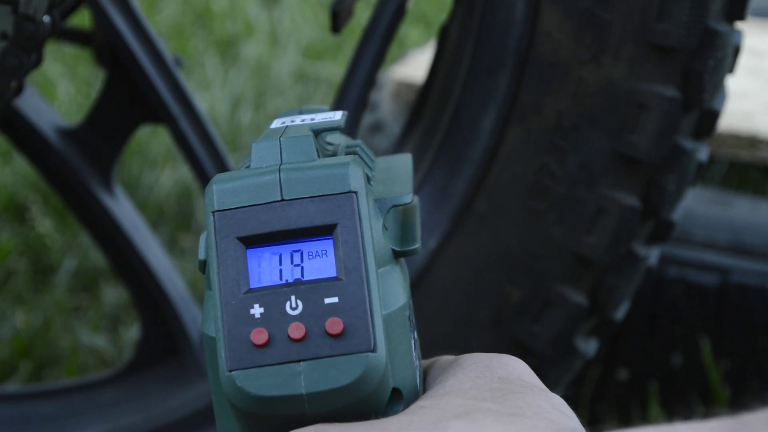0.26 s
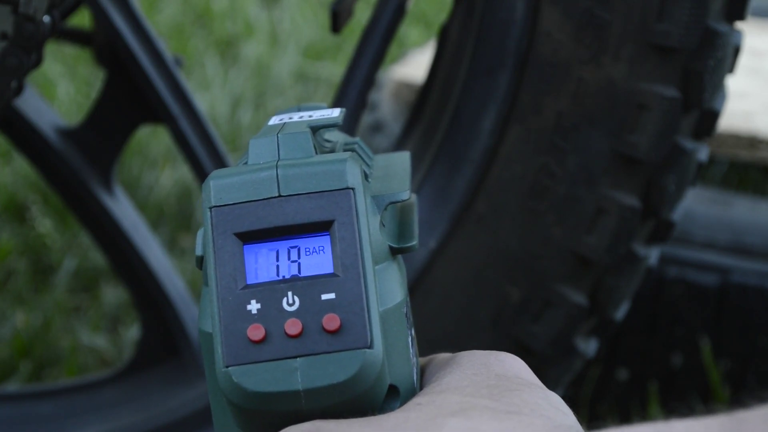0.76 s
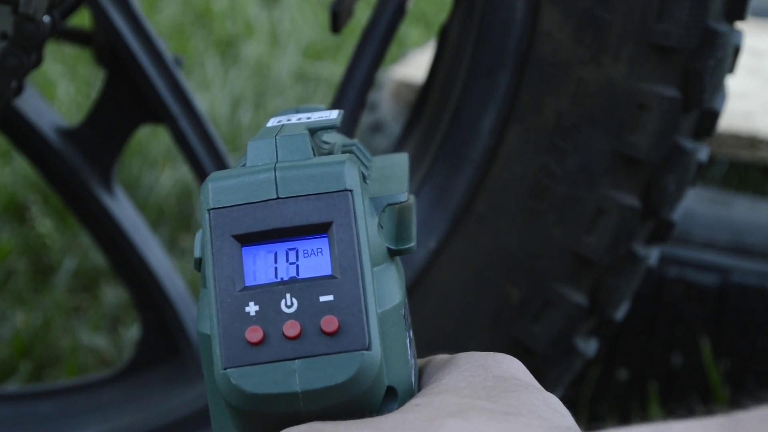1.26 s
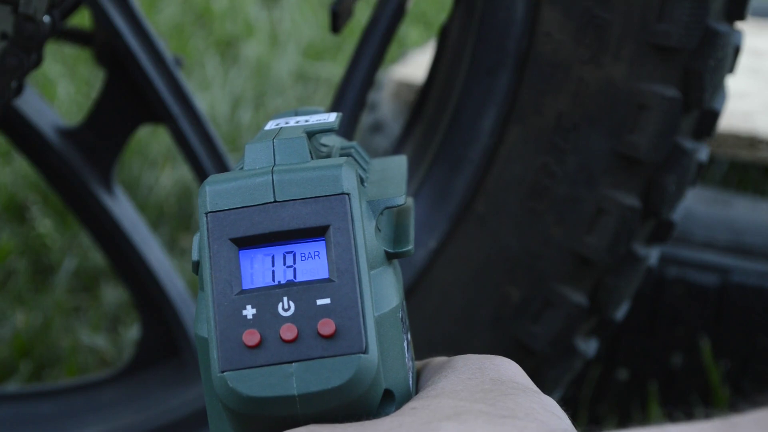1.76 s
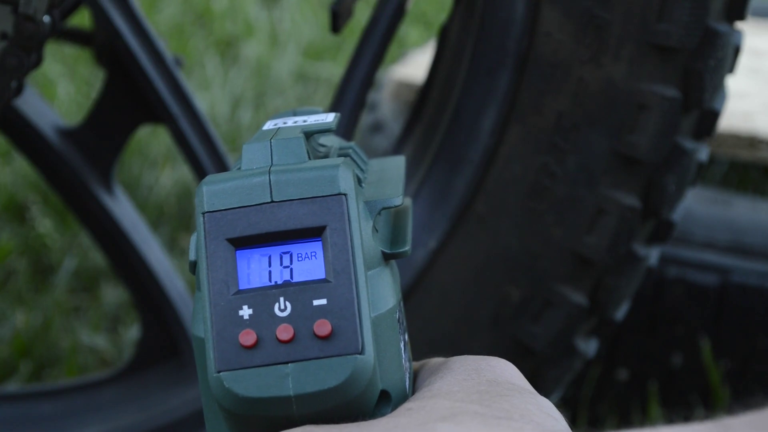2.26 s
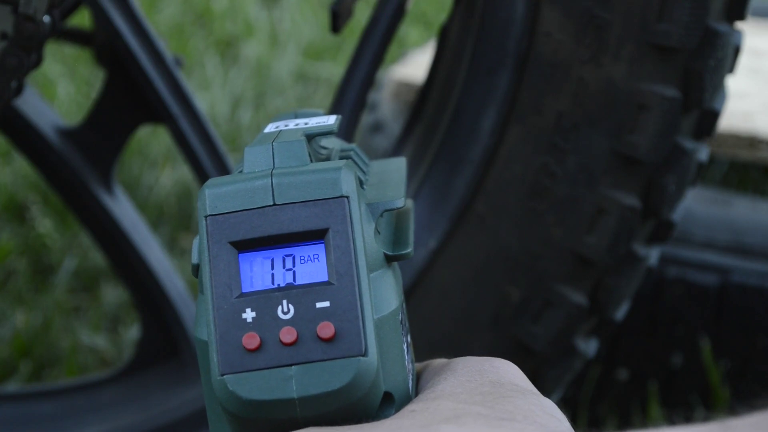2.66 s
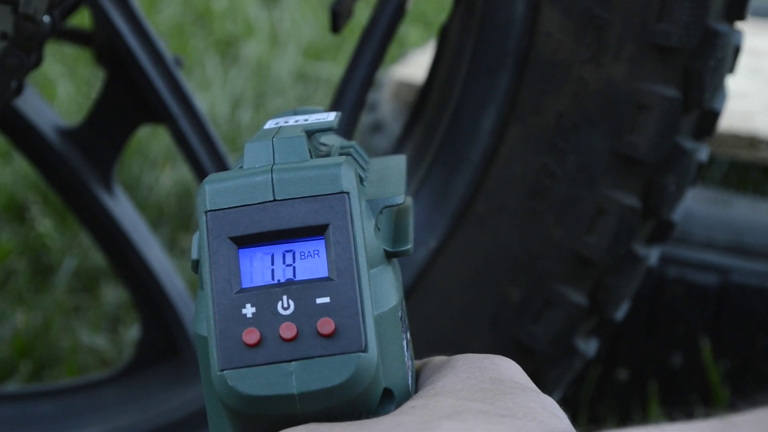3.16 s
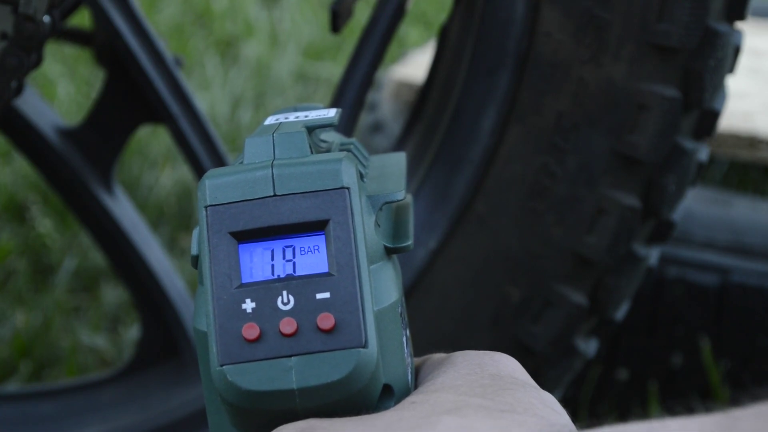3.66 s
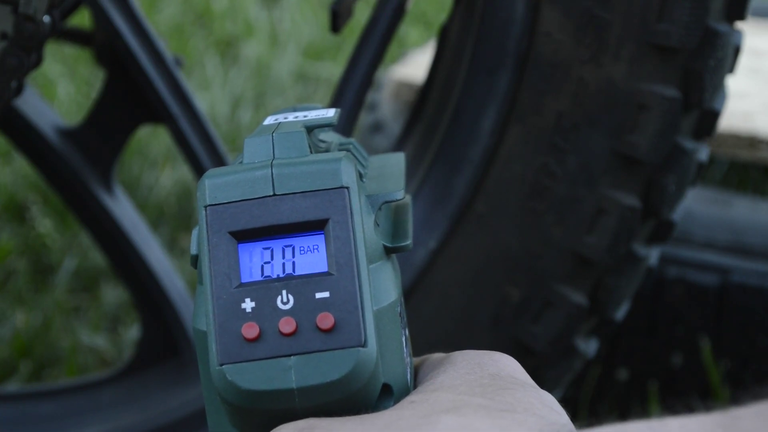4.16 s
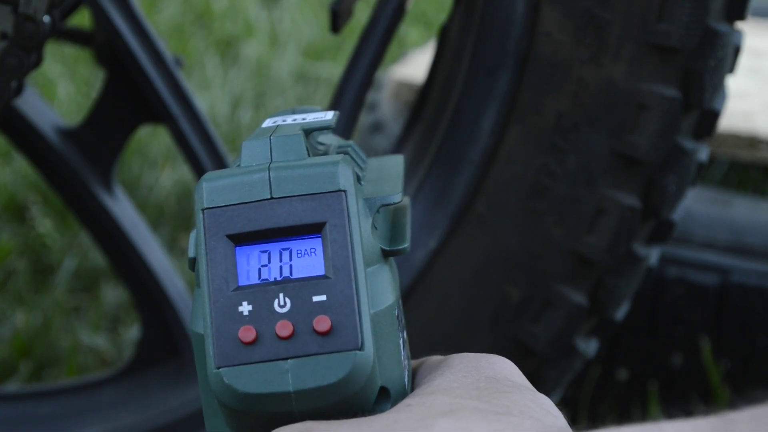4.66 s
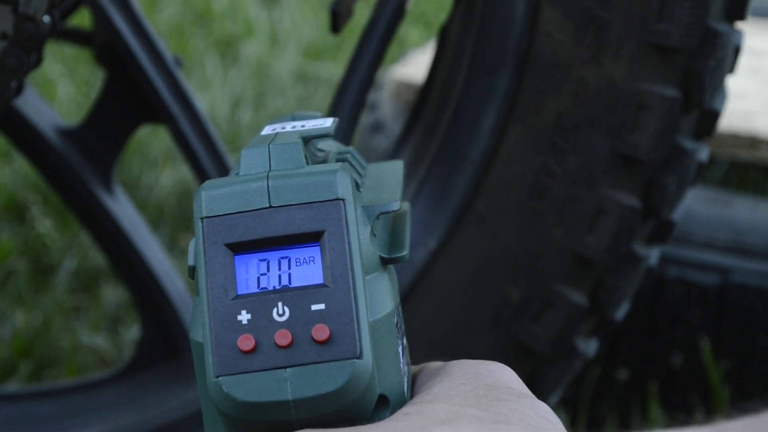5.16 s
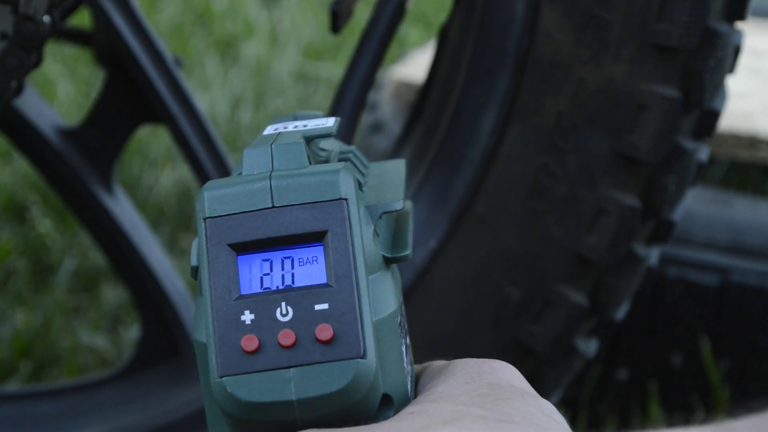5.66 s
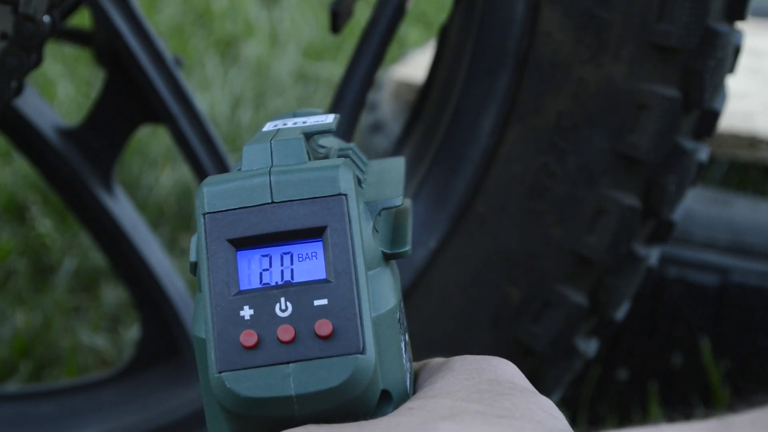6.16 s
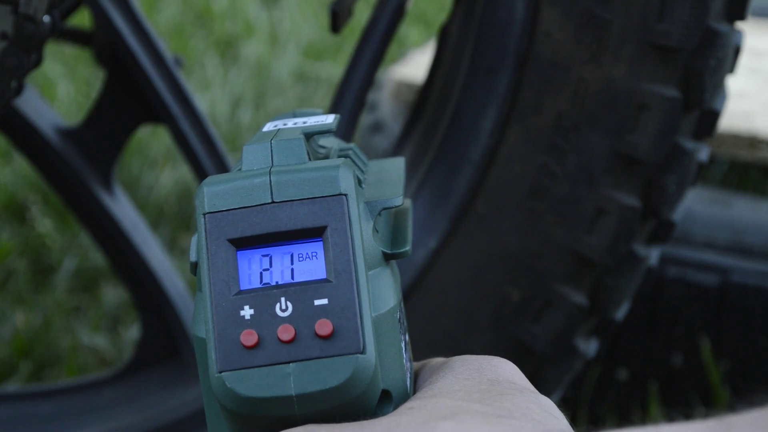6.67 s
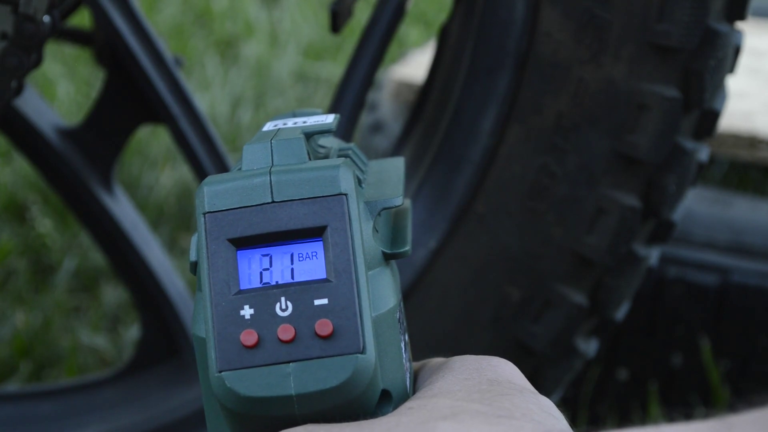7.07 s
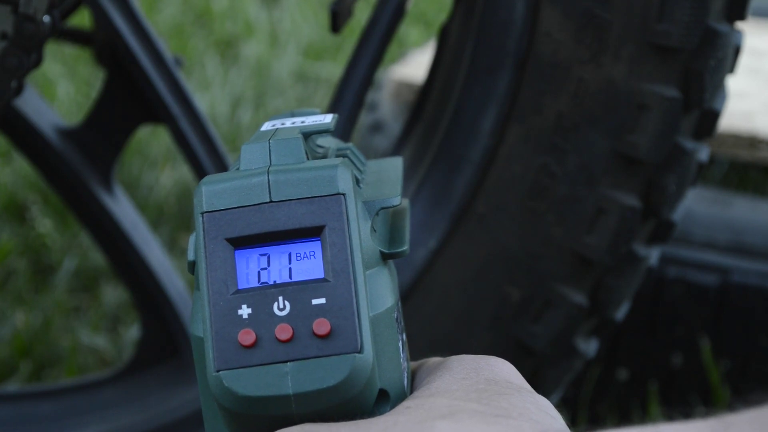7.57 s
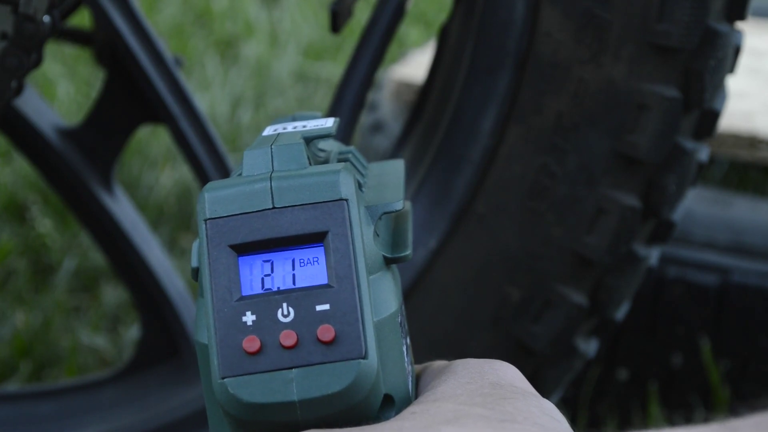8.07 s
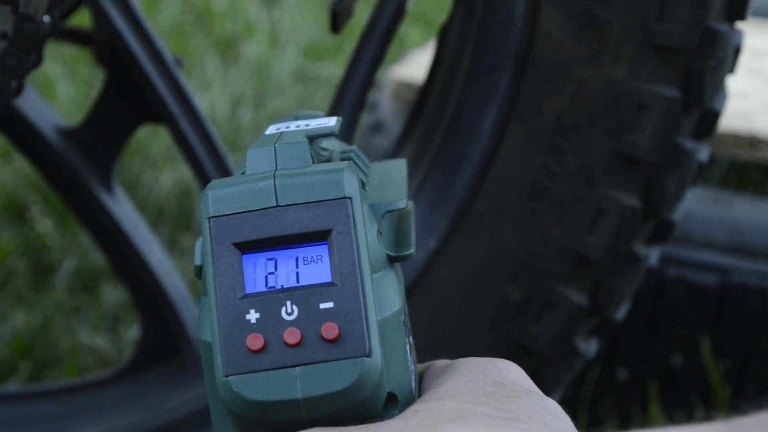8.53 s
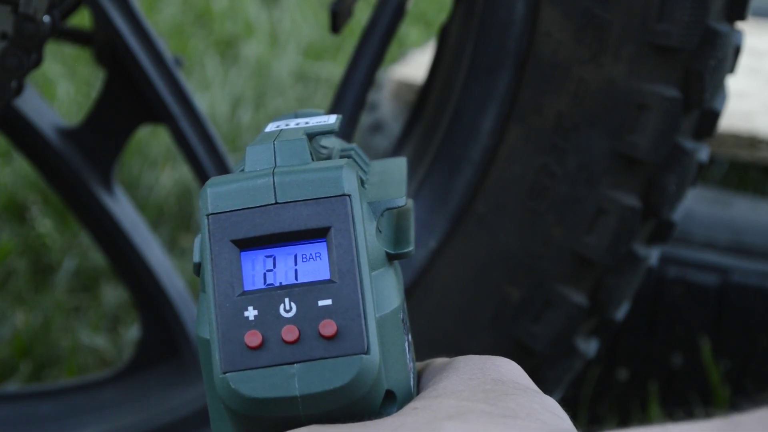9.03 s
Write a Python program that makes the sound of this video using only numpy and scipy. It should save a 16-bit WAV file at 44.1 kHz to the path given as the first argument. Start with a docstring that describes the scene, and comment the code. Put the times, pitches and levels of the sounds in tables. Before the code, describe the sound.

Continuous handheld tyre inflator, very close and dry, in open air. Rapid valve pops blur into a rough low buzz; plastic gears whine and grind brightly around three kilohertz, with motor hum and steady hiss. Speed hardly changes, wavering slightly under load. A distant engine rumble dies away early on; the pump continues to the end.

```python
"""Out of doors, a small cordless piston pump fills a tyre, held close to the microphone. From the start an
11-tooth pinion drives a 49-tooth crank gear: at every turn the loaded teeth whine and grind in the plastic
housing and a valve pops, alternately early and late, over motor hum and a hiss of air. A far engine rumbles
behind the opening seconds and fades away; past the middle a faint hum swells and goes. The pump's tones are
sines locked to the crank or motor, the faint hum a sine of steady pitch; grinding, hiss and rumble are filtered
noise."""
import sys
import numpy as np
from scipy import signal
from scipy.fft import rfft, irfft
from scipy.io import wavfile
from scipy.ndimage import uniform_filter1d, minimum_filter1d, map_coordinates

SR = 44100
rng = np.random.default_rng(int(sys.argv[2]) if len(sys.argv) > 2 else 0)


def generate_wav(signal):
    """Clip the signal to [-1, 1] and save it as 16-bit WAV at the path in sys.argv[1]."""
    frames = np.transpose(np.atleast_2d(signal))
    scaled = np.clip(frames, -1, 1) * 32767
    pcm = np.round(scaled).astype(np.int16)
    wavfile.write(sys.argv[1], SR, pcm)


N = 410130
T = np.arange(N) / SR  # seconds

# The crank's speed sags and wavers as the tyre fills. Each row: time in seconds, speed in crank turns per second.
CRANK_SPEED = [(0.0, 57.666), (0.79, 57.762), (1.39, 57.764), (2.37, 57.635), (3.17, 57.752),
               (4.16, 57.625), (4.35, 57.671), (5.34, 57.629), (6.73, 57.633), (7.12, 57.508),
               (7.52, 57.635), (8.11, 57.579), (8.31, 57.616), (9.3, 57.44)]
# Pitches at which the loaded teeth sing in the housing. Each entry: cycles per crank turn.
SONG_PITCHES = [54.2, 46.3, 53.5, 39.5, 35, 63.5, 96, 107, 145, 150, 194]
# Swell of each song, in the same order. Each row: centre in turns, spread in turns,
# peak level in dB before runout and drift, share of the growth as the tyre fills (0 to 1).
SONG_SWELLS = [(0.857, 0.12, -21, 0), (0.017, 0.1, -27, 0), (0.231, 0.041, -26.5, 0.28),
               (0.68, 0.076, -43.5, 0), (0.0991, 0.13, -38, 0), (0.75, 0.061, -44, 0),
               (0.96, 0.15, -41.5, 0.43), (0.87, 0.1, -46.5, 0.11), (1, 0.12, -48, 0),
               (0.733, 0.076, -44, 0), (0.89, 0.08, -46, 0)]
# Tooth tone. Each row: multiple of the tooth rate, level at the start in dB rms.
TOOTH_TONES = [(1, -58), (2, -53.5)]
# Valve pop and shaking of the pump body. Each row: crank order (cycles per turn), level in dB rms before drift.
POP_ORDERS = [(1, -55), (2, -47), (3, -55.5), (4, -51.5), (5, -53), (6, -55.5), (7, -52), (8, -51.5),
              (9, -48.5), (10, -43.5), (11, -55), (12, -46), (13, -50), (14, -44.5), (15, -54.5), (16, -57),
              (17, -68), (18, -57.5), (19, -54.5), (20, -54), (21, -51.5), (22, -60), (23, -55.5),
              (24, -53.5), (25, -51.5), (26, -54), (27, -63), (28, -63)]
# Commutator hum. Each row: motor order (cycles per motor turn), level in dB rms before drift.
COMMUTATOR_ORDERS = [(2, -69), (3, -55), (6, -62)]
# Broad colour of the plastic housing. Each row: frequency in Hz, relative level in dB.
HOUSING_COLOUR = [(380, -28.5), (700, -12), (1400, -11), (2500, -8), (3200, -4.5), (4200, -14),
                  (5200, -17.5), (6200, -27), (7500, -27), (9500, -22.5), (11000, -32), (13000, -36),
                  (16000, -40.5)]
# Panel resonances above that colour and dips below it. Each row: centre in Hz, width in Hz, height in dB.
PANEL_RESONANCES = [(830, 210, 2.5), (1800, 58, -7.5), (1950, 200, 1), (2180, 250, -2), (2760, 200, 2.5),
                    (2757, 165, -7.5), (3275, 270, 3), (3774, 340, 3.5), (4150, 99, 3.5), (4350, 230, -3.5),
                    (4515, 79, 8.5), (4900, 75, 2), (5770, 230, 1), (5850, 110, 0), (6630, 280, 7.5),
                    (7840, 150, 3), (8720, 210, -0.5), (9390, 620, 4.5), (9600, 280, 0.5),
                    (10350, 220, 8.5), (11250, 300, 0), (11600, 200, 1), (12500, 500, 2.5),
                    (13800, 500, 2.5)]
# Far engine fading in the distance. Each row: time in seconds, level in dB rms.
FAR_ENGINE_LEVEL = [(0, -48), (.5, -53), (1, -50.5), (1.5, -61), (2.7, -64), (4, -65), (5, -74), (9.3, -76)]
# Resonances of its drone. Each row: centre in Hz, width in Hz, relative level in dB.
DRONE_RESONANCES = [(42, 8, -2), (50, 5, 0), (66, 10, -8), (100, 10, 5), (135, 37, -2), (232, 26, -1.5)]
# Swell of the faint hum. Each row: time in seconds, level in dB rms.
FAINT_HUM_LEVEL = [(5, -85), (5.5, -68), (6.2, -71), (7, -72), (7.5, -85)]

START_TURN, GEAR_TEETH, PINION_TEETH = .142, 49, 11
# Tooth load drops on the return stroke and peaks as the piston meets the pressure.
# Each: centre in turns, spread in turns, change in dB.
SLACK, PUSH = (.42, 0.15, -9.5), (0.774, 0.035, 2.4)
# As the tyre fills, the second tooth tone fades and the whine just under it grows.
TOOTH_FADE_DB_PER_S, FILL_DB_PER_S = -.9, 0.25
GRIND_DB, HISS_DB = -33, -37  # rms
POP_AT, POP_GLIDE, POP_SWING = 0.0534, 0.00434, 0.0083  # turns; turns per order; turns
# Above this order the glide ends and the knock arrives all at once, at this point in turns.
GLIDE_TOP_ORDER, KNOCK_AT = 20.5, .12
SHAKE_LAG = 0.099  # cycles: the odd low orders, from the crank's unbalance, trail the pop
FAINT_HUM_HZ = 117
LIMIT_DB, BASS_CUT_HZ, TREBLE_CUT_HZ = -16.5, 35, 15770


def gear_whine(slip, motor):
    """Under load the teeth sing in the housing once a turn; the untrue pinion modulates the songs."""
    whine = 0
    for cycles, (at, spread, db, growth) in zip(SONG_PITCHES, SONG_SWELLS):
        swell, angle = bump(slip, at, spread)
        level = gain_of(db + growth * FILL_DB_PER_S * T + 0.2 * wander(points=900))
        whine = whine + level * swell * np.sin(2 * np.pi * cycles * angle)
    runout = 1 + 0.23 * np.cos(2 * np.pi * motor) + 0.093 * np.cos(4 * np.pi * motor + 1)
    return runout * whine


def tooth_tone(slip):
    """Each meeting of teeth gives one cycle; the second multiple fades as the tyre fills."""
    tone = 0
    for k, db in TOOTH_TONES:
        level = gain_of(db + (k - 1) * TOOTH_FADE_DB_PER_S * T)
        tone = tone + level * np.sin(2 * np.pi * k * GEAR_TEETH * slip)
    return np.sqrt(2) * tone


def grinding(crank, motor):
    """Worn surfaces and random friction rub harder under load and sound through the housing."""
    load_db = sum(db * bump(crank, at, spread)[0] for at, spread, db in (SLACK, PUSH))
    fine_only = signal.butter(3, 3500, "high", fs=SR, output="sos")
    scratches = signal.sosfilt(fine_only, worn(crank, size=760))
    rub = 1.15 * scratches + .5 * worn(motor, size=170) + 0.85 * rng.standard_normal(N)
    return gain_of(GRIND_DB) * housing(rub * gain_of(1.4 * load_db))


def gears(crank, motor):
    """Whine and tooth tone share the play in the teeth, which blurs their timing; grinding joins them."""
    slip = crank + 0.00032 * wander(points=1500)
    return gear_whine(slip, motor) + tooth_tone(slip) + grinding(crank, motor)


def valve(crank):
    """One pop a turn glides from a thump up to a knock; it lands early and late by turns."""
    late = POP_SWING * np.cos(np.pi * (crank + 0.95)) + 0.00023 * wander(points=600)
    pop = 0
    for k, db in POP_ORDERS:
        low = min(k, GLIDE_TOP_ORDER)
        lag = low * (POP_AT + POP_GLIDE * low)  # cycles
        lag = lag + KNOCK_AT * (k - low) + SHAKE_LAG * (k in (1, 3, 5))
        delay = lag / k + late * np.tanh((k / 5.1) ** 2)  # the heavy low shaking keeps even time
        level = gain_of(db + 0.36 * wander(points=80))
        pop = pop + level * np.cos(2 * np.pi * k * (crank - delay))
    alternation = gain_of(0.39 * np.cos(np.pi * (crank + 0.79)))  # louder and softer by turns
    return np.sqrt(2) * alternation * pop


def commutator_hum(motor):
    """Brushes crossing the commutator hum at multiples of the motor's turning, with drifting levels."""
    hum = 0
    for k, db in COMMUTATOR_ORDERS:
        hum = hum + gain_of(db + 2.0 * wander(points=200)) * np.sin(2 * np.pi * k * motor)
    return np.sqrt(2) * hum


def air_hiss():
    """A steady hiss of air: white noise coloured by the housing."""
    return gain_of(HISS_DB) * housing(rng.standard_normal(N))


def far_engine():
    """A distant engine: noise in a few low resonances, fading away."""
    hz = np.fft.rfftfreq(N, 1 / SR)
    shape = sum(gain_of(db) / (1 + (2 * (hz - f) / w) ** 2) for f, w, db in DRONE_RESONANCES)
    drone = evened(irfft(rfft(rng.standard_normal(N)) * shape, N))
    return gain_of(along(FAR_ENGINE_LEVEL, T)) * drone


def faint_hum():
    """One steady low sine that swells and goes in the background."""
    return gain_of(along(FAINT_HUM_LEVEL, T)) * np.sqrt(2) * np.sin(2 * np.pi * FAINT_HUM_HZ * T)


def housing(x):
    """Causal, minimum-phase filter: broad colour with a bump or dip at each panel resonance; output at unit rms."""
    hz = abs(np.fft.fftfreq(8192, 1 / SR))
    f, db = np.transpose(HOUSING_COLOUR)
    colour = np.interp(np.log(hz + 1), np.log(f), db)
    bumps = sum(d / (1 + (2 * (hz - c) / w) ** 2) for c, w, d in PANEL_RESONANCES)
    log_gain = np.log(gain_of(colour + bumps))
    spectrum = np.exp(np.conj(signal.hilbert(log_gain)))  # the phase follows from the gain
    taps = np.fft.ifft(spectrum).real[:4096]
    return evened(signal.oaconvolve(x, taps)[:N])


def worn(turns, size):
    """A rough surface that comes round the same at every turn."""
    surface = rng.choice([-1., 1.], size)
    return surface[(turns % 1 * size).astype(int)]


def bump(turns, at, spread):
    """A smooth hump once a turn; also gives the angle from its centre, in turns."""
    angle = (turns - at + .5) % 1 - .5
    return np.exp(-.5 * (angle / spread) ** 2), angle


def wander(points):
    """Smooth chance through that many random values."""
    return map_coordinates(rng.standard_normal(points + 4), [np.linspace(1, points, N)], order=3)


def along(points, at):
    """Straight lines between table rows."""
    return np.interp(at, *np.transpose(points))


def gain_of(db):
    """Amplitude factor for a level in dB."""
    return 10 ** (np.asarray(db) / 20)


def evened(x):
    """Scale to unit rms."""
    return x / np.sqrt(np.mean(x ** 2))


def scene():
    """The pump close by, the engine and hum behind; the gear ratio ties motor to crank."""
    crank = START_TURN + np.cumsum(along(CRANK_SPEED, T)) / SR  # turns
    motor = crank * GEAR_TEETH / PINION_TEETH  # turns
    pump = gears(crank, motor) + valve(crank) + commutator_hum(motor) + air_hiss()
    return (pump + far_engine() + faint_hum())[None]


def record(dry):
    """The microphone drops the deepest bass, a fast limiter holds the peaks down, then the treble is cut."""
    dry = signal.sosfilt(signal.butter(2, BASS_CUT_HZ, "high", fs=SR, output="sos"), dry)
    safe_gain = np.minimum(1, gain_of(LIMIT_DB) / (abs(dry) + 1e-9))
    lowest = minimum_filter1d(safe_gain, size=41)
    smooth_gain = uniform_filter1d(uniform_filter1d(lowest, size=21), size=21)  # eases down round each peak
    treble_cut = signal.firwin(1023, TREBLE_CUT_HZ, window=("kaiser", 9), fs=SR)
    return signal.oaconvolve(dry * smooth_gain, treble_cut[None], "same")


dry = scene()
out = record(dry)
generate_wav(out)
```